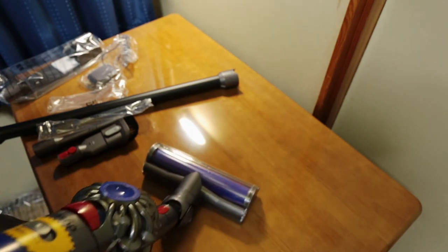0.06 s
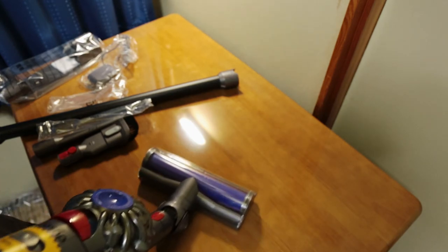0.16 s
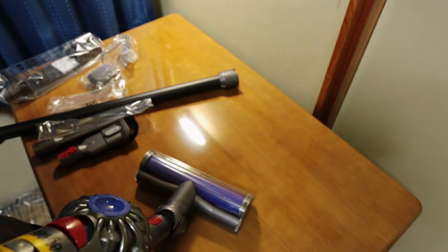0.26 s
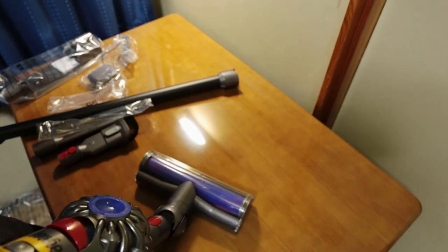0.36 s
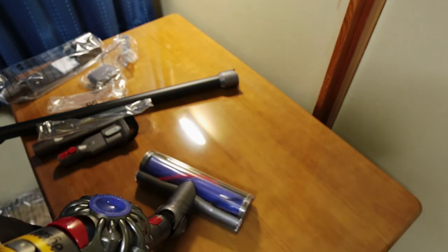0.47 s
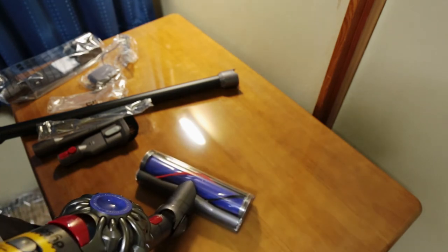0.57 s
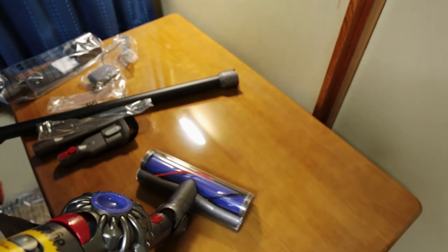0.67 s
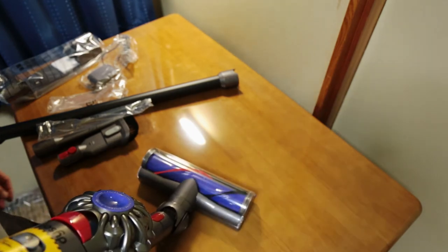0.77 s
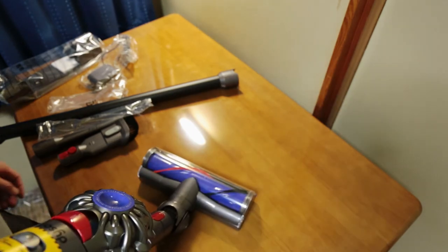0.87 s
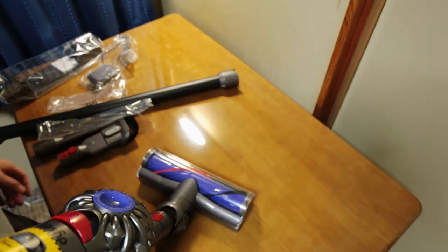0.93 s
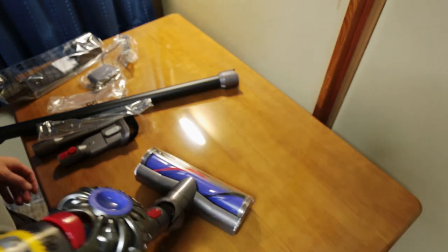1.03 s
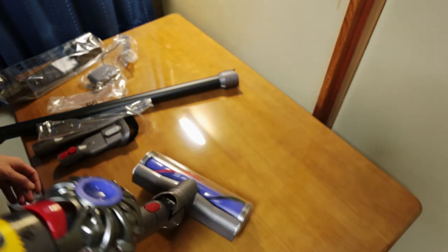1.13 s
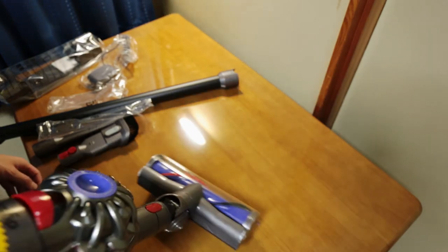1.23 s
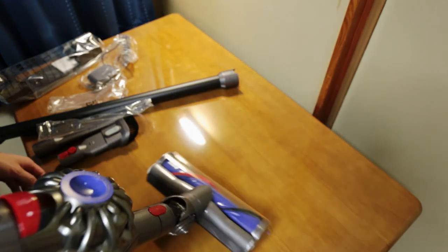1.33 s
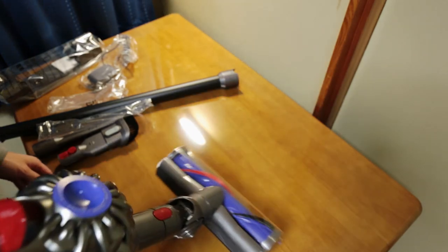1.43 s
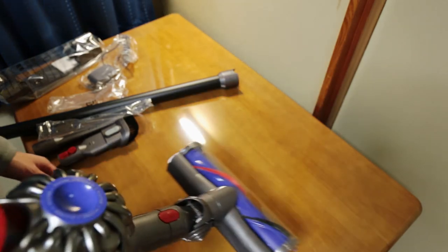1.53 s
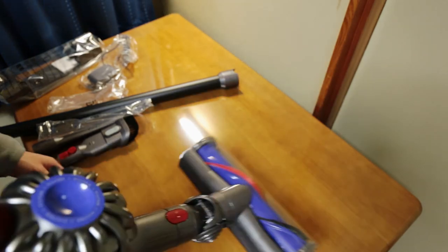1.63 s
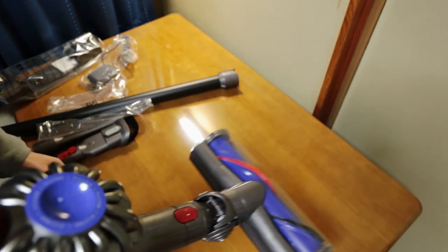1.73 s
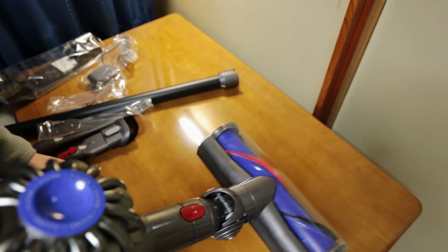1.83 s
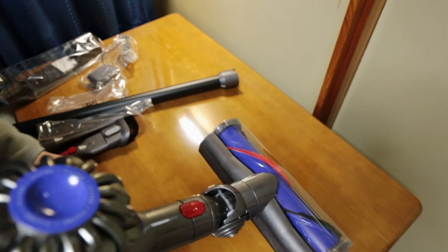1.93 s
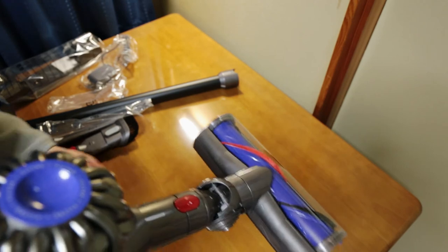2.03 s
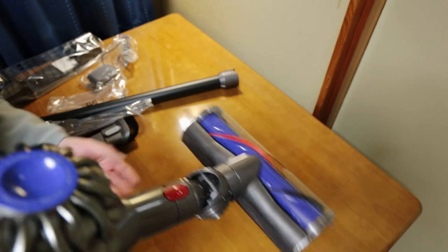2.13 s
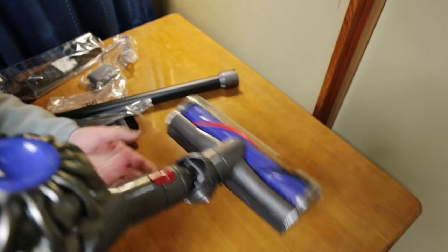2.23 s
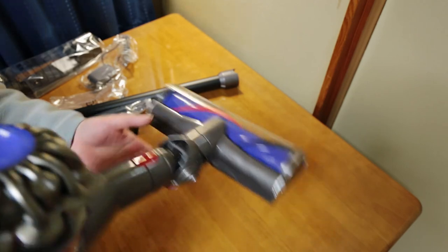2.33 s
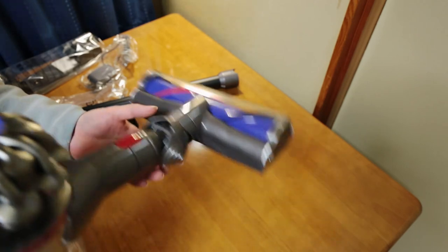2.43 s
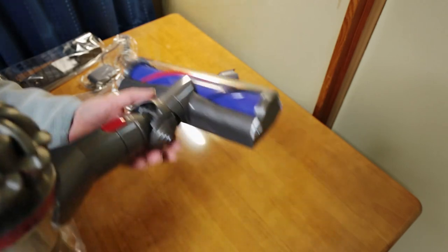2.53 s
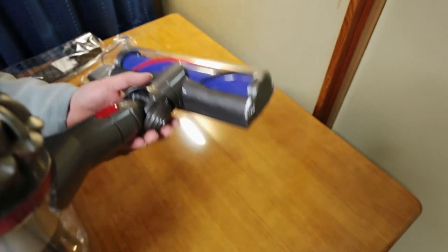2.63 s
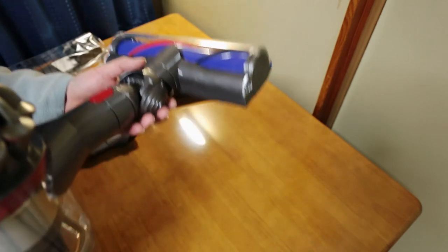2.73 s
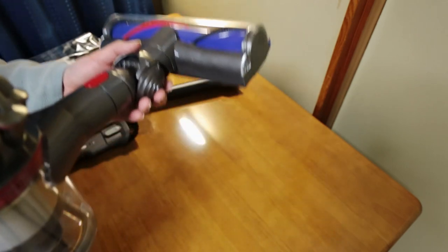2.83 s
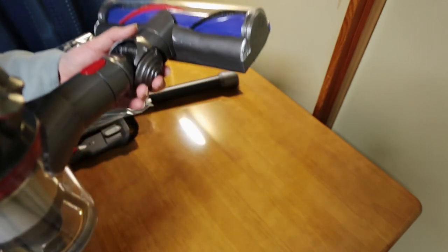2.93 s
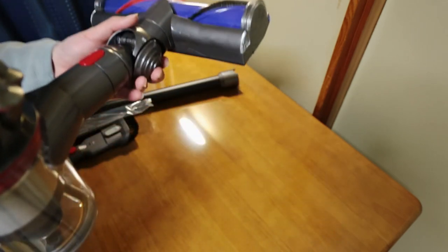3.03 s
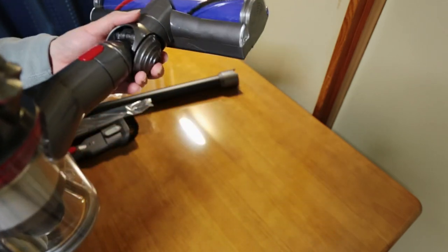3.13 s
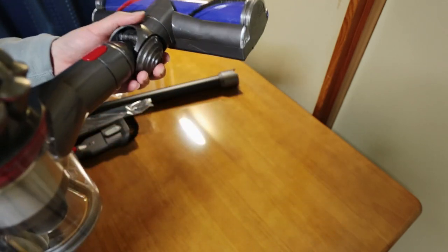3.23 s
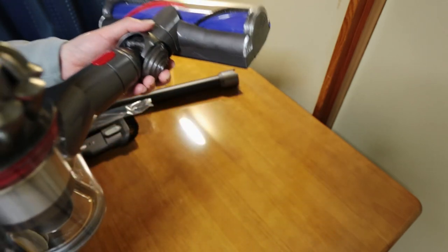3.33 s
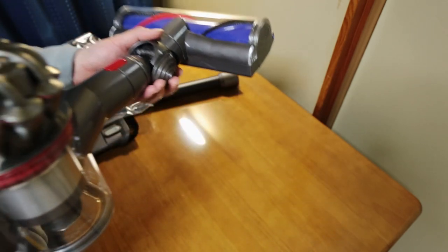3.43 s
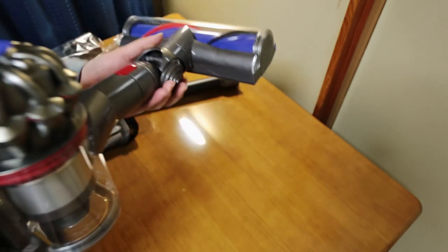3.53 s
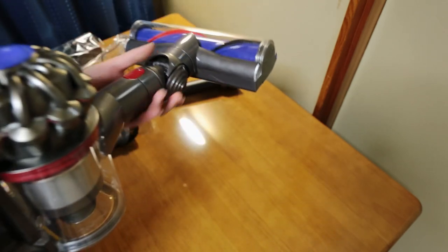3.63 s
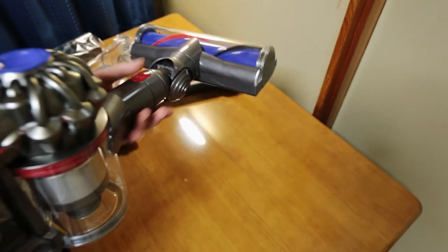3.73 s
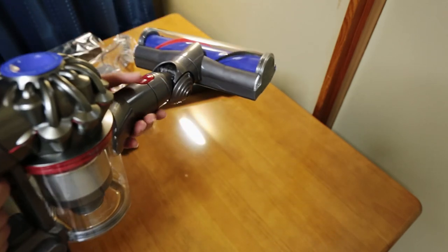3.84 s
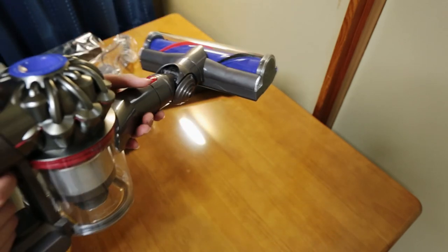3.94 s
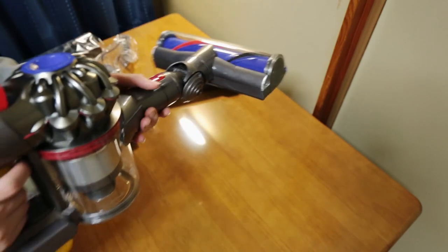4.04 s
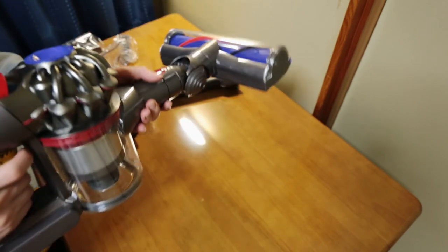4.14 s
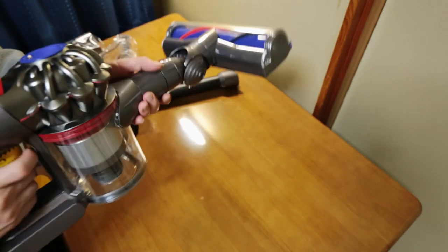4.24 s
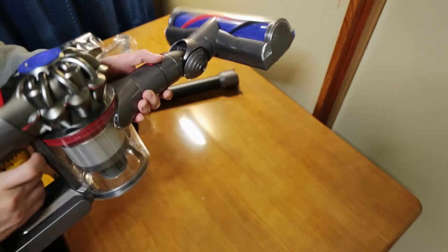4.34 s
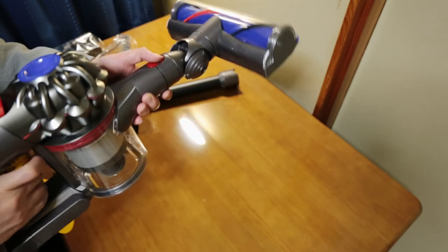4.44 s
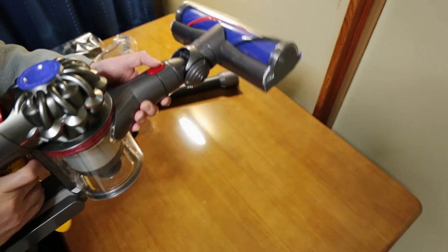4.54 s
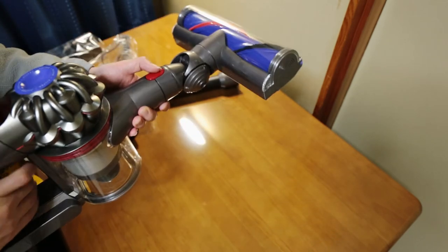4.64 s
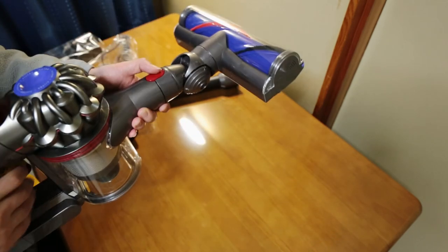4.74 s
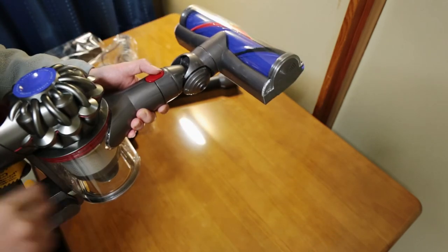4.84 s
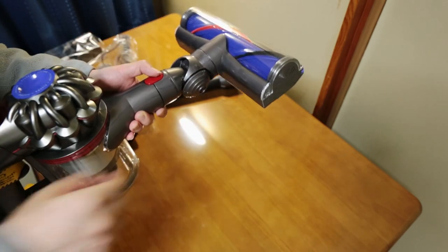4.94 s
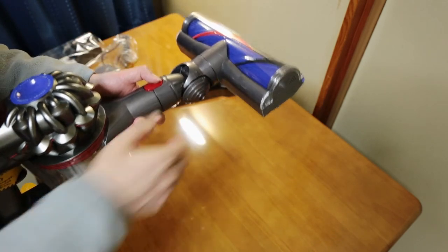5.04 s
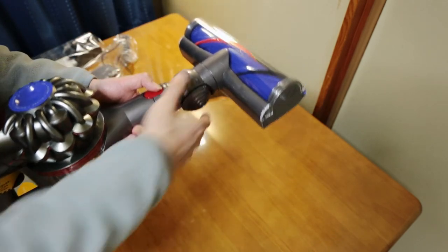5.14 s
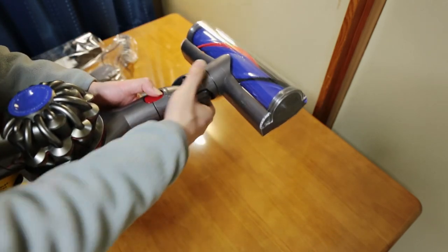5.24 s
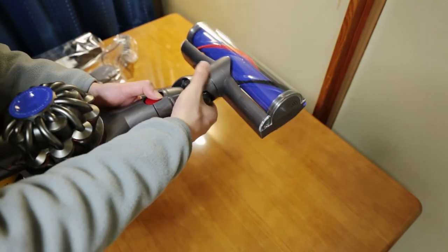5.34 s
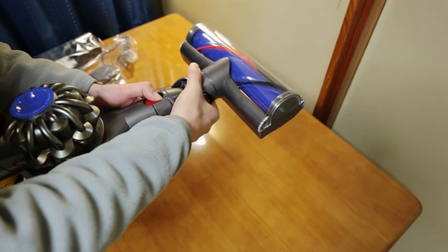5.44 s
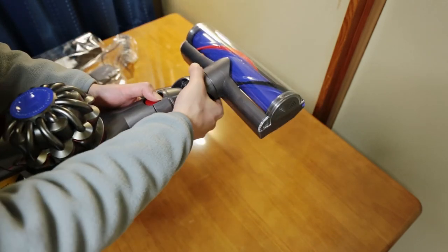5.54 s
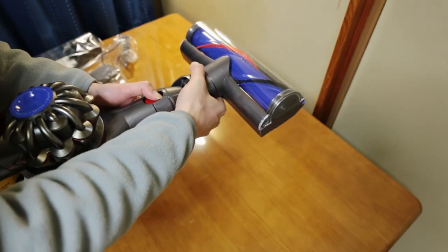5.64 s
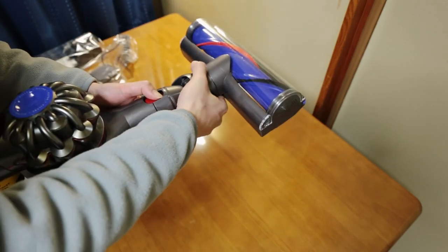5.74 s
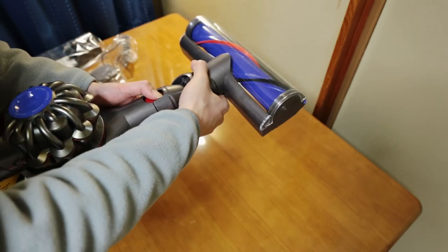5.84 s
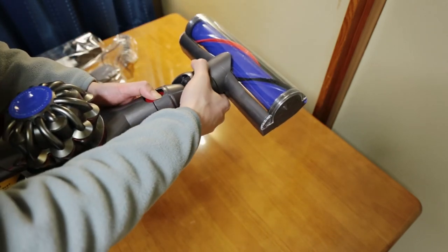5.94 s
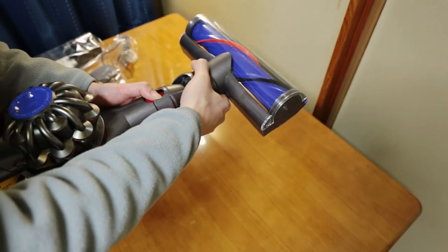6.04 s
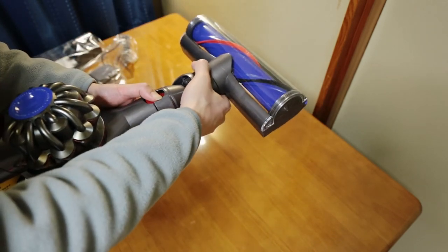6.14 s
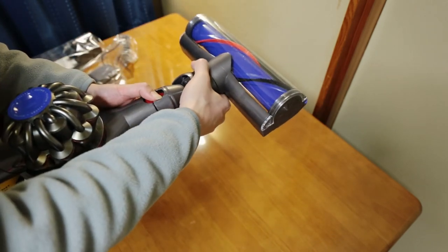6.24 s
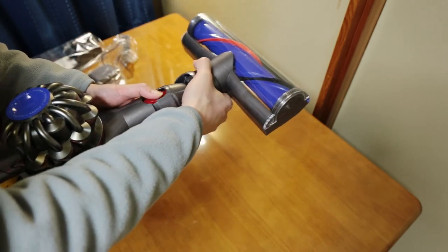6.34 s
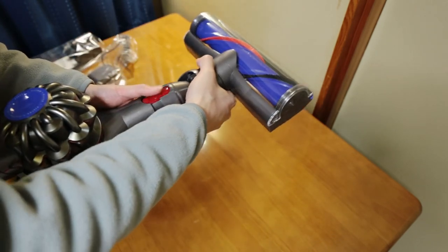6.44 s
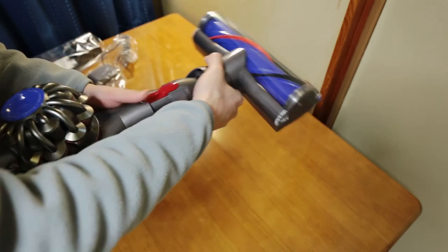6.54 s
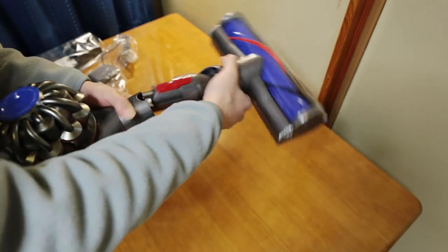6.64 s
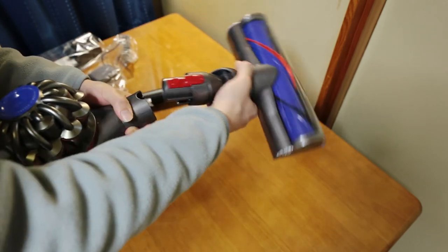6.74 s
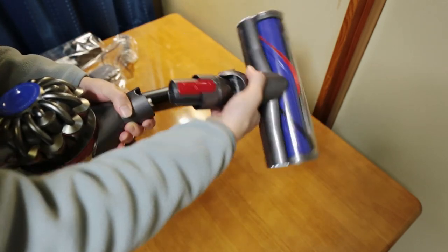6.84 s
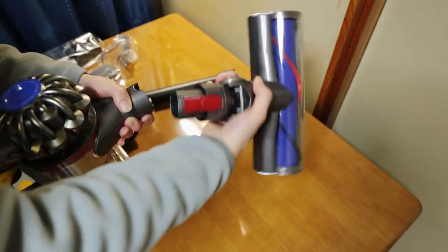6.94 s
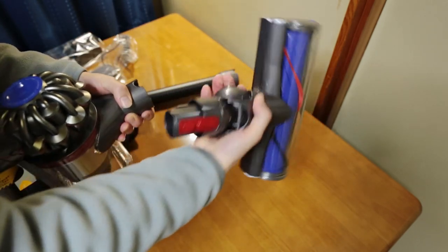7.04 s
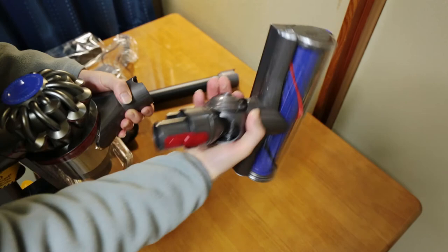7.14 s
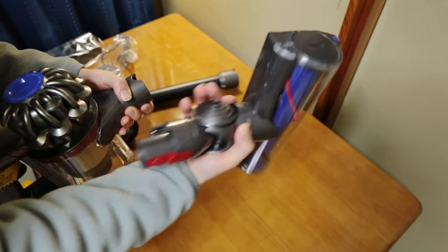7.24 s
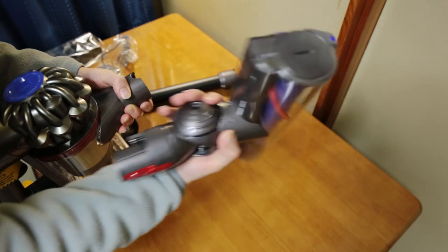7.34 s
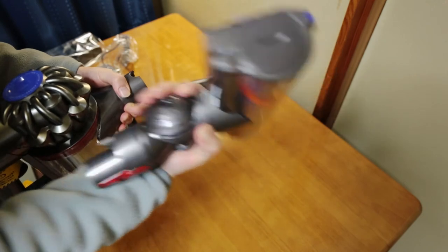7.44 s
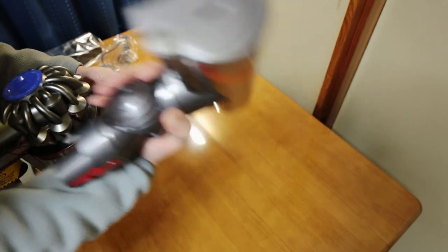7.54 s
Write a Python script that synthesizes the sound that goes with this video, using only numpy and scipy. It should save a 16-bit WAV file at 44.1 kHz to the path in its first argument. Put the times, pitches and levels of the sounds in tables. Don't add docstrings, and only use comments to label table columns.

```python
import sys
import numpy as np
from scipy import signal
from scipy.fft import rfft, irfft
from scipy.io import wavfile

SR = 44100
rng = np.random.default_rng(int(sys.argv[2]) if len(sys.argv) > 2 else 0)


def to_linear_factor(level_db):
    exponent = np.asarray(level_db, float) / 20
    return 10 ** exponent


def wav_out(sig):
    wavfile.write(sys.argv[1], SR, np.round(np.clip(np.atleast_2d(sig).T, -1, 1) * 32767).astype(np.int16))


N = 334719

# time [s], turns per second [Hz].
SHAFT_COAST = [(.236, 872.1), (.27, 772), (.33, 630), (.4, 511), (.55, 335), (.7, 223), (.85, 149),
               (.97, 100.5), (1.1, 64)]


def seconds():
    return np.arange(N) / SR


def white():
    return rng.standard_normal(N)


def rms_one(x):
    return x / np.sqrt(np.mean(x ** 2) + 1e-20)


def drift(rate):
    r = np.exp(-80 * np.pi * rate / SR)
    slow = signal.lfilter([1], [1, -2 * r, r * r], rng.standard_normal(N // 40 + 2002))[2000:]
    return np.interp(np.arange(N) / 40, np.arange(len(slow)), rms_one(slow))


def coloured(x, spectrum):
    hz = np.maximum(np.arange(len(x) // 2 + 1) * SR / len(x), 1)
    table_hz, table_db = np.transpose(spectrum)
    gain = to_linear_factor(np.interp(np.log(hz), np.log(table_hz), table_db))
    return rms_one(irfft(rfft(x) * gain, len(x)))


def band(x, low_hz, high_hz):
    sos = signal.butter(2, [low_hz, min(high_hz, 0.45 * SR)], "band", fs=SR, output="sos")
    return signal.sosfilt(sos, x)


def resonate(x, hz, width):
    r = np.exp(-np.pi * width / SR)
    zeros = np.array([1, 0, -1]) * (1 - r * r) / 2
    return signal.lfilter(zeros, [1, -2 * r * np.cos(2 * np.pi * hz / SR), r * r], x)


def speed(rows):
    s, hz = np.transpose(rows)
    return np.exp(np.interp(seconds(), s, np.log(hz)))


def driven():
    power_off_s, fade_s = 0.24, 0.043
    return np.clip((power_off_s - seconds()) / fade_s + 1, 0, 1)


def casing(hz):
    # centre [Hz], width [Hz], gain [dB].
    modes = [(190, 38, -8), (333, 22, 9.5), (396, 18, 14.5), (471, 36, 15.5), (1080, 500, 6),
             (2070, 550, 6), (4090, 240, 19.5)]
    swells = sum((to_linear_factor(db) - 1) / (1 + (2 * (hz - centre_hz) / width) ** 2) for centre_hz, width, db in modes)
    return 1 + swells


def rotor():
    unbalance = [1]
    blades = [7, 8, 10, 14]
    magnets = [4, 12, 16, 20]
    # driven level [dB], coasting level [dB], loss per halving of speed [dB],
    # swell at the mount resonance [dB].
    levels = [(-35, -36.5, 16, 16), (-28.5, -40.5, 12, 10), (-38, -56, 10.5, 16), (-52, -67, 16, -16),
              (-46, -65, 34, 17), (-55, -55.5, -3.5, -2), (-70, -81.5, -0.5, 27), (-83, -85, -2.5, 14),
              (-82, -76, 3.5, 21)]
    mount_hz, mount_octaves = 108, 0.29
    stop_s = SHAFT_COAST[-1][0]
    span = round(stop_s * SR)
    hz, on = speed(SHAFT_COAST)[:span], driven()[:span]
    turn = 2 * np.pi * np.cumsum(hz) / SR
    halvings = np.log2(hz[0] / hz)
    shaking = np.exp(-(np.log2(hz / mount_hz) / mount_octaves) ** 2)
    out = np.zeros(N)
    for k, (driven_db, coast_db, loss_db, swell_db) in zip([*unbalance, *blades, *magnets], levels):
        coasting = to_linear_factor(coast_db - loss_db * halvings + swell_db * shaking) * casing(k * hz)
        level = on * to_linear_factor(driven_db) + (1 - on) * coasting
        flutter = to_linear_factor(1.5 * drift(25)[:span])
        out[:span] += level * flutter * np.sin(k * turn)
    halted = np.clip((stop_s - seconds()) / 0.048, 0, 1)
    return np.sqrt(2) * out * halted


def gear():
    # frequency [Hz], level [dB].
    mesh_lines = [(672, -41), (850, -39), (5152, -46), (2019, -44), (2062, -38), (2105, -27), (2191, -25),
                  (2234, -34), (2277, -32), (2315, -37), (2369, -34), (2406, -38), (2455, -44)]
    # time [s], mesh frequency [Hz].
    brush_coast = [(.245, 2191), (.3, 1600), (.345, 1200), (.4, 760), (.48, 470), (.535, 205), (.575, 155),
                   (.64, 145), (.69, 120)]
    coast_db, chatter_db, stop_fade_s = -19, 3.5, 0.11
    mesh_hz, on = speed(brush_coast), driven()
    clock = np.cumsum(mesh_hz / brush_coast[0][1]) / SR
    lines = np.zeros(N)
    for hz, db in mesh_lines:
        lines += to_linear_factor(db + 0.8 * drift(15)) * np.sin(2 * np.pi * (hz * clock + rng.random()))
    coasting = to_linear_factor(coast_db + chatter_db * drift(60)) * casing(mesh_hz)
    halted = np.clip((brush_coast[-1][0] - seconds()) / stop_fade_s, 0, 1)
    return np.sqrt(2) * (on + (1 - on) * coasting) * lines * halted


def airflow():
    # frequency [Hz], density [dB per Hz].
    air_colour = [(18, -58.5), (30, -17.5), (526, -7.5), (740, -12.5), (866, -18.5), (937, -11), (1220, -5),
                  (1760, -6.5), (2170, -1.5), (2540, -5.5), (5450, -21), (6210, -18.5), (7470, -18.5),
                  (12600, -22), (16000, -32)]
    # frequency [Hz], width [Hz], level [dB].
    duct = [(84, 13, 5), (151, 7.9, -3), (203.3, 11.8, 9.5), (311, 71, 2), (460, 100, 3), (850, 44, 5.5),
            (1651, 5.9, 14), (2040, 26, -11), (2160, 610, -16), (4020, 380, 1)]
    # full flow level [dB], loss at half flow [dB], steepening [power].
    air_bands = [(-25, 8.5, 1.18), (-30, 10, 1.2), (-31.5, 14.5, 1.2), (-28, 12, 1.2)]
    edges_hz = [40, 750, 2500, 6000, 16000]
    flow_lag_s = 0.011
    air = coloured(white(), air_colour)
    air = air + sum(to_linear_factor(db) * resonate(air, hz, width) for hz, width, db in duct)
    flow = speed([(s + flow_lag_s, hz) for s, hz in SHAFT_COAST])
    halvings = np.maximum(np.log2(flow[0] / flow), 0)
    out = np.zeros(N)
    for k, (full_db, loss_db, power) in enumerate(air_bands):
        level = to_linear_factor(full_db - loss_db * halvings ** power + 1.85 * drift(22))
        sign = (-1) ** k
        out += sign * rms_one(band(air, edges_hz[k], edges_hz[k + 1])) * level
    whistle = rms_one(resonate(air, 1660, 25))
    out += to_linear_factor(-45 - 4 * halvings ** 2 + 2.5 * drift(15)) * whistle
    dying = np.clip((SHAFT_COAST[-1][0] - seconds()) / 0.2, 0, 1)
    return dying * out


def shell(x, body_db):
    # frequency [Hz], width [Hz], level [dB].
    housing = [(880, 108, 4.5), (1450, 250, -50), (2000, 1800, -11.5), (2250, 280, -21), (2740, 520, -14),
               (3450, 1050, -10), (3900, 100, -46)]
    modes = [to_linear_factor(db + body_db) * resonate(x, hz, width) for hz, width, db in housing]
    return x + sum(mode * (-1) ** k for k, mode in enumerate(modes))


def knocks():
    # time [s], peak [dB], ring [Hz], bright edge [dB].
    lifting = [(.985, -26.5, 1480, -20), (1.976, -47, 3760, -10), (2.022, -50, 1100, 1.5),
               (2.117, -42, 1510, 2), (2.312, -18.5, 3570, -17), (2.377, 0.3, 2700, -4),
               (2.383, -8, 1380, -6), (2.415, -6.5, 1010, -10), (2.436, -15, 1490, -4),
               (2.486, -10, 2430, -8), (2.542, -29, 1400, -2), (2.555, -11.5, 1085, -19),
               (2.605, -28.5, 886, -5), (2.628, -1.5, 3020, 0.8), (2.634, -9.5, 1100, -7),
               (2.848, -31, 1450, 5.5), (2.91, -39, 1490, -6), (2.957, -36.5, 1480, -13),
               (2.986, -34.5, 1480, -6), (3.083, -32.5, 1650, -9), (3.132, -34.5, 1550, -3)]
    turning = [(3.461, -28.5, 1010, -9.5), (3.545, -45, 703, 7.5), (3.582, -34, 1930, -10),
               (3.606, -30.5, 945, -7), (3.636, -19.5, 2220, -9), (3.679, -24, 1270, -5),
               (3.693, -31, 910, 4), (3.703, -15.5, 990, -13), (3.718, -14, 2430, -16),
               (3.741, -14, 1010, -15), (3.745, -15, 1000, -17), (3.764, -17, 2700, -13),
               (3.774, -23, 920, -11), (3.793, -16.5, 1130, -13), (3.861, -26, 920, -16),
               (3.965, -31.5, 1340, -29), (4.037, -37.5, 2200, -24)]
    shifting = [(4.12, -23, 1340, -2), (4.232, -37.5, 726, 2), (4.252, -34, 2600, 0.1),
                (4.263, -36, 2320, 5), (4.287, -36, 3000, 3), (4.312, -25.5, 1450, 0),
                (4.364, -32, 2400, -2), (4.405, -41, 1220, 4), (4.461, -35.5, 2900, -3),
                (4.54, -38.5, 3170, -4), (4.653, -27, 2620, -10)]
    gripping = [(5.099, -21.5, 1620, -14), (5.286, -27, 2810, -2), (5.289, -13.5, 2710, -10),
                (5.295, -18, 2650, -8), (5.301, -8.5, 2250, -10), (5.31, -18, 2300, -13),
                (5.338, -17.5, 2240, -28), (5.37, -13, 2630, -8), (5.38, -12.5, 2570, -14),
                (5.404, -28, 2320, 0), (5.415, -22, 2640, -24)]
    pressing = [(5.55, -31.5, 850, -7), (5.607, -25.5, 1490, -14), (5.654, -23, 1570, -9.5),
                (5.741, -21.5, 1750, -11), (5.795, -32.5, 964, -23), (5.857, -31.5, 1080, -32),
                (5.966, -44, 2600, -6), (6.0, -22, 2160, -7.5), (6.099, -24.5, 2000, -31)]
    pulling = [(6.264, -18, 2230, -0.5), (6.392, -35.5, 1980, 7), (6.408, -26, 3270, -9),
               (6.448, -36, 850, -12), (6.488, -37, 1950, -21), (6.497, -25.5, 2040, -21),
               (6.508, -12, 2220, -11), (6.526, -20.5, 1620, -22), (6.538, -12.5, 2340, -0.5),
               (6.639, -26.5, 2250, -7), (6.848, -35.5, 2910, -21), (6.869, -27, 2600, -9.5),
               (6.934, -42, 880, 1), (7.016, -34.5, 1260, -22), (7.389, -36.5, 2850, -3)]
    # decay T60 [s], thud [dB], shell [dB].
    holds = [
        (0.074, -37, -0.5),
        (0.12, -38.5, 5),
        (0.069, -40.5, -13),
        (0.088, -40, -6),
        (0.066, -33.5, -5),
        (0.085, -37.5, -5),
    ]
    thud_follows = 0.4
    tube_hz, tube_t60_s, tube_db = 375.5, 0.34, -15.5
    out, t = np.zeros(N + SR), np.arange(SR // 5) / SR
    onset = (1 - np.exp(-t / 0.00039)) * (1 + to_linear_factor(2.5) * np.exp(-t / 0.0013))
    for rows, (t60, thud_db, body_db) in zip([lifting, turning, shifting, gripping, pressing, pulling], holds):
        for s, peak_db, hz, bright_db in rows:
            burst = rng.standard_normal((3, len(t))) * onset * to_linear_factor(-60 * t / max(t60, 0.01))
            burst[:, 8] += [7.5, 9, 7.5]
            low_hz, top_hz = np.clip(0.5 * hz, 750, 1500), min(2.82 * hz, 4800)
            chatter = shell(band(band(burst[0], low_hz, top_hz), 346, 4870), body_db)
            ring = 2.5 * resonate(burst[0] * to_linear_factor(-60 * t / 0.04), hz, 0.2 * hz)
            body = (chatter + ring) / np.max(np.abs(chatter + ring))
            edge = band(burst[1] * to_linear_factor(-60 * t / 0.35), 3250, 10500) * to_linear_factor(bright_db - 10)
            tube = resonate(burst[2], tube_hz * rng.uniform(0.78, 1.3), 1.1 / tube_t60_s)
            thud = band(burst[2], 269, 523) + 10 * to_linear_factor(tube_db) * tube
            thud = thud * to_linear_factor(thud_db + 20 - (1 - thud_follows) * peak_db)
            at = round(s * SR)
            out[at:at + len(t)] += to_linear_factor(peak_db - 3.5) * (body + edge + thud)
    return out[:N]


def rubbing():
    # peak time [s], rise [s], fall [s], level [dB], brightness [dB].
    table_slides = [
        (1.04, 0.22, 0.17, -46.5, -6),
        (1.11, 0.23, .2, -65, -5),
        (1.165, 0.053, 0.071, -45, 5.5),
        (1.235, 0.28, 0.083, -40, 9.5),
    ]
    hand_rubs = [
        (3.822, 0.1, 0.076, -39.5, -16),
        (3.86, 0.087, 1, -53.5, -0.5),
        (4.82, 0.21, 0.11, -84.5, 38),
        (5.43, 0.15, 0.08, -43.5, -4.5),
        (6.4, 0.11, .25, -55, 11.5),
        (6.52, 0.037, 0.31, -61, 17),
        (6.68, 0.38, 0.076, -54.5, -25),
    ]
    fade_db = 34.5
    t = seconds()
    slip_chance = 1500 * to_linear_factor(6 * drift(60)) / SR
    slips = (rng.random(N) < slip_chance) * to_linear_factor(2.06 * np.minimum(rng.exponential(1, N), 4))
    grain = shell(slips * rng.choice([-1, 1], N) + 0.15 * white(), body_db=-1.5)
    bands_hz = [(600, 1700), (1300, 4800), (5600, 13500)]
    dull, sharp, bright = [rms_one(band(band(grain, low, high), low, high)) for low, high in bands_hz]
    boom = rms_one(band(white(), 45, 465))
    out = np.zeros(N)
    for strokes, boom_db in [(table_slides, -47), (hand_rubs, -62)]:
        for s, rise, fall, level_db, tilt_db in strokes:
            away = np.maximum((s - t) / max(rise, 0.01), (t - s) / max(fall, 0.01))
            pressure = to_linear_factor(-fade_db * away)
            colour = dull + to_linear_factor(0.66 * tilt_db - 1) * sharp + to_linear_factor(1.08 * tilt_db - 8) * bright
            out += pressure * (to_linear_factor(level_db) * colour + to_linear_factor(boom_db) * boom)
    return out


def sleeve():
    # middle [s], half length [s], level [dB], centre [Hz], width [Hz].
    cloth_drag = (2.1, .26, -62, 3900, 700)
    s, half, level_db, hz, width = cloth_drag
    swell = np.clip(1 - ((seconds() - s) / half) ** 2, 0, 1)
    return to_linear_factor(level_db + 2 * drift(6.7)) * swell * rms_one(resonate(white(), hz, width))


def bumps():
    # time [s], level [dB].
    palms = [
        (2.97, -54.5),
        (5.64, -53),
        (6.03, -52),
        (6.37, -55),
        (6.67, -49.5),
        (6.78, -54.5),
    ]
    t = seconds()
    press = sum(to_linear_factor(db) * np.exp(-((t - s) / 0.022) ** 2) for s, db in palms)
    return press * rms_one(band(white(), 300, 460))


def room(x):
    t60_s, wall_cut_hz = 0.24, 4640
    t = np.arange(SR // 2) / SR
    noise = rng.standard_normal(len(t)) * (1 - np.exp(-t / 0.00075))
    tail = band(noise, 134, wall_cut_hz) * to_linear_factor(-60 * t / t60_s)
    tail += band(noise, wall_cut_hz, 10400) * to_linear_factor(-60 * t / (0.56 * t60_s))
    return signal.fftconvolve(x, tail / np.sqrt(np.sum(tail ** 2)))[:N]


def hiss():
    # frequency [Hz], density [dB per Hz].
    hiss_colour = [(15, -36), (25, -19.5), (130, -3), (206, -11.5), (277, -12.5), (384, -13), (427, -18),
                   (641, -18), (775, -17), (1650, -19.5), (2410, -20.5), (4030, -25.5), (5140, -31.5),
                   (11300, -30), (16000, -28)]
    # frequency [Hz], width [Hz], level [dB].
    hiss_bands = [(9130, 440, 6.5), (9700, 150, 10), (11000, 860, 8), (12400, 170, 6), (13500, 140, -14),
                  (14200, 240, 7), (15500, 140, -20)]
    noise = coloured(white(), hiss_colour)
    noise += sum(to_linear_factor(db - 3 + 0.97 * drift(0.42)) * resonate(noise, hz, width) for hz, width, db in hiss_bands)
    return to_linear_factor(-55 + 1.3 * drift(0.4)) * noise


def scene():
    motor = rotor() + gear() + airflow()
    handling = knocks() + rubbing() + sleeve() + bumps()
    echo = to_linear_factor(-11) * room(handling)
    return np.tile(motor + handling + echo + hiss(), (2, 1))


def low_pass(x):
    return signal.sosfilt(signal.butter(12, 16480, fs=SR, output="sos"), x)


def record(dry):
    rounded = 0.9 * np.tanh(dry / 0.9)
    top_cut = signal.ellip(10, 0.5, 45, 15780, fs=SR, output="sos")
    return low_pass(signal.sosfilt(top_cut, rounded))


dry = scene()
out = record(dry)
wav_out(out)
```